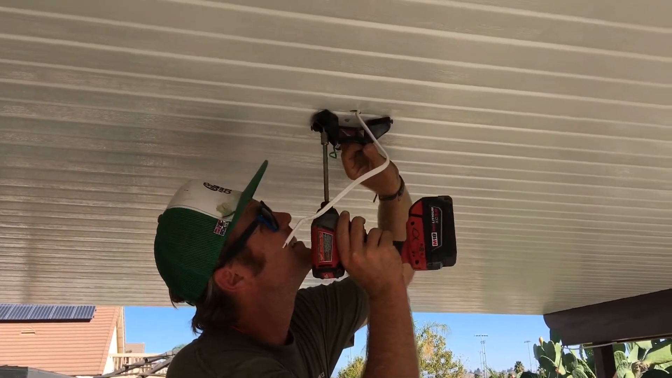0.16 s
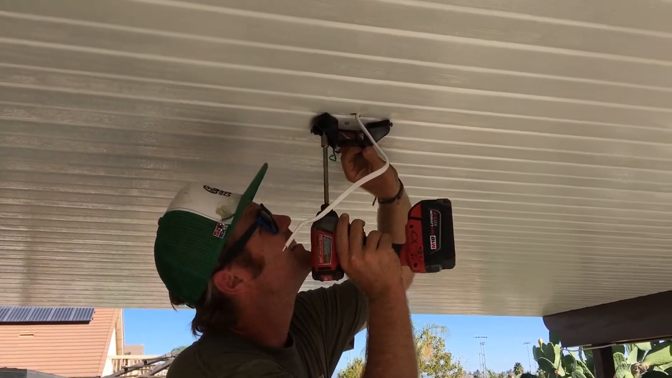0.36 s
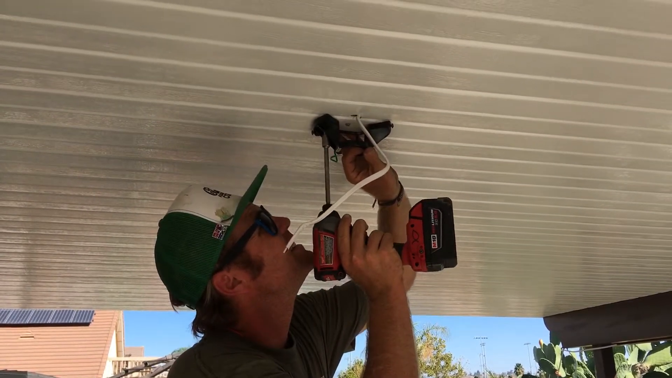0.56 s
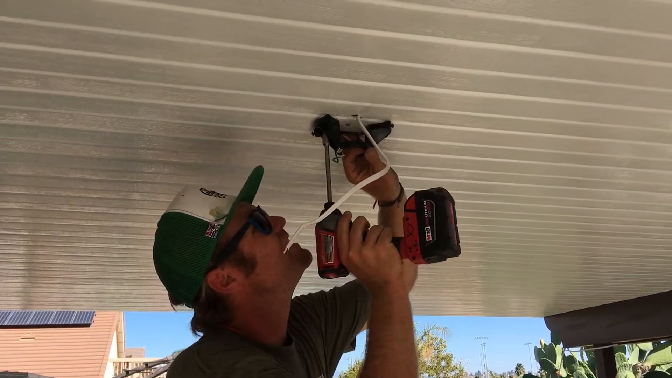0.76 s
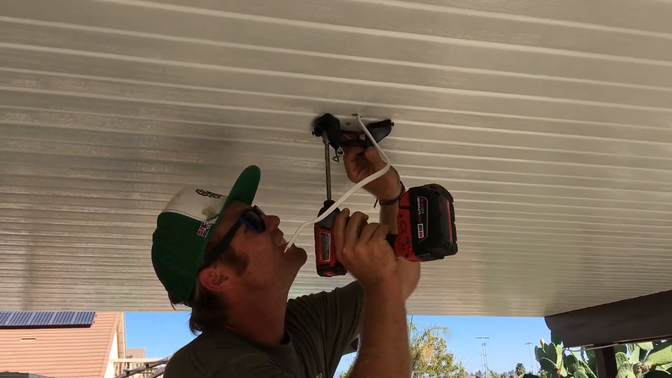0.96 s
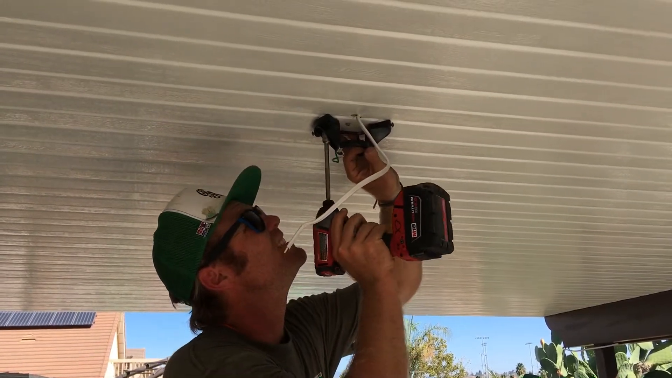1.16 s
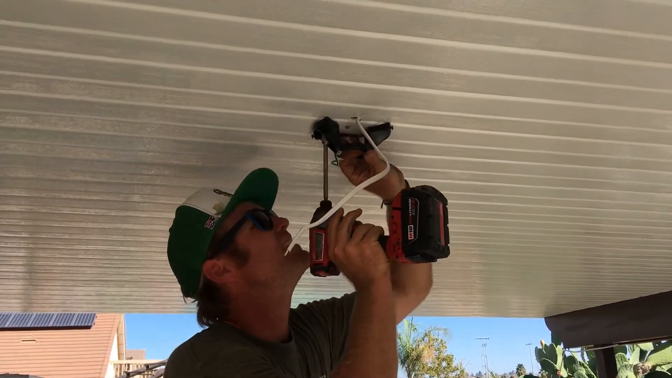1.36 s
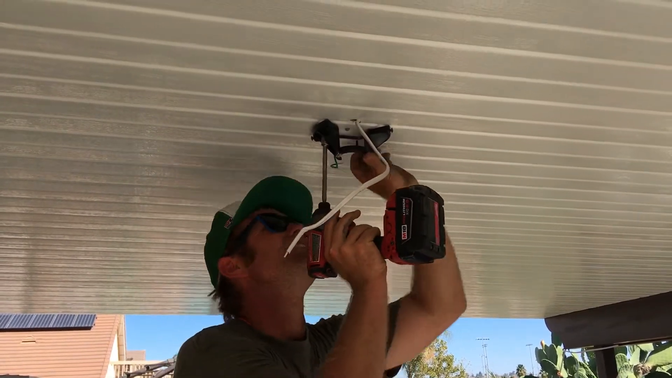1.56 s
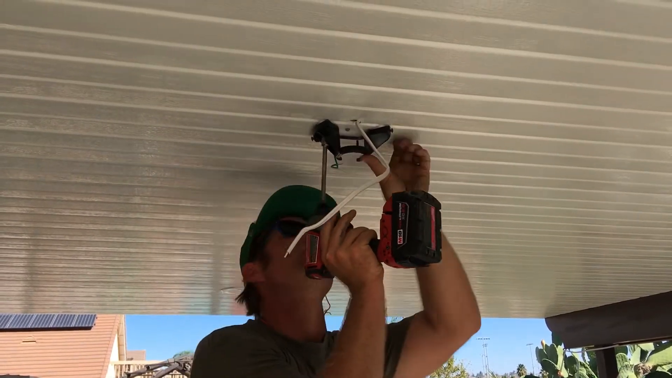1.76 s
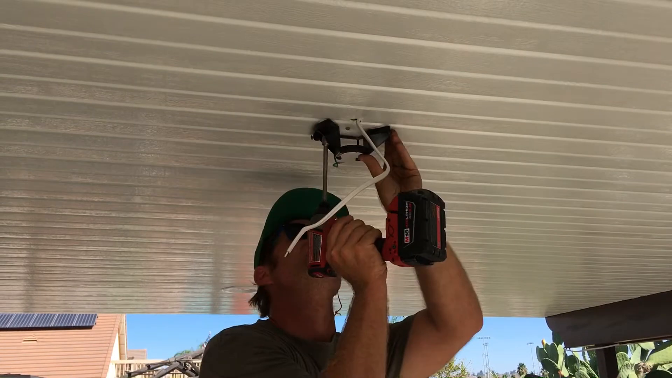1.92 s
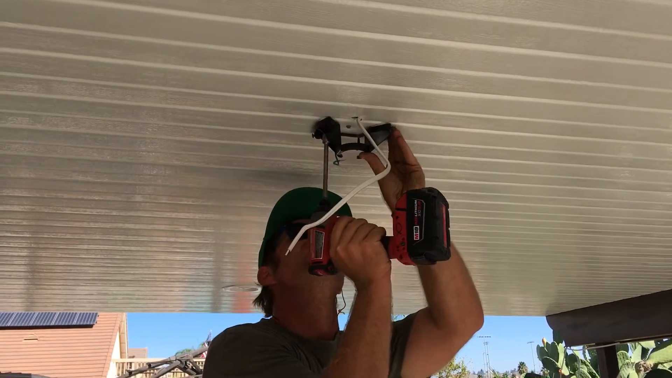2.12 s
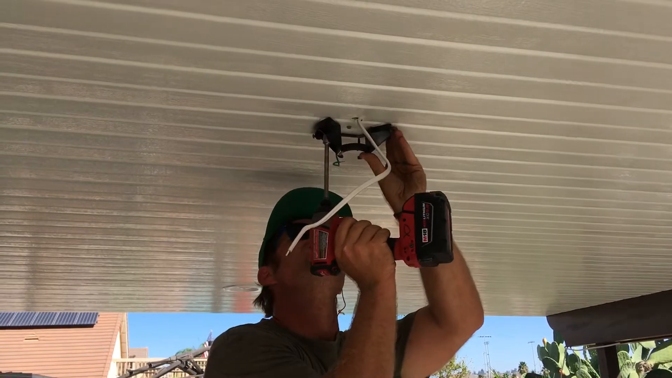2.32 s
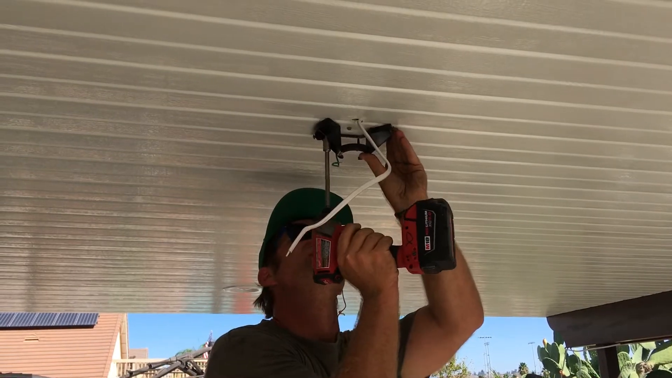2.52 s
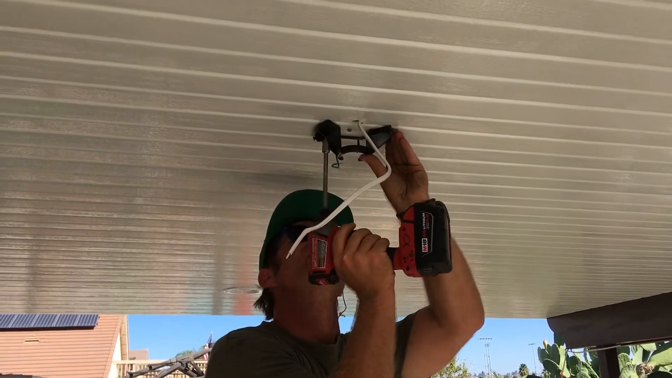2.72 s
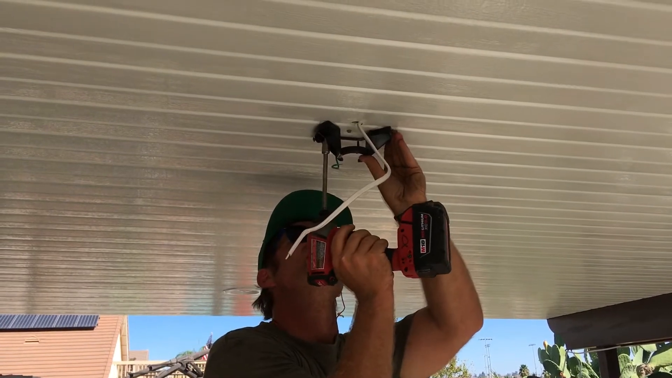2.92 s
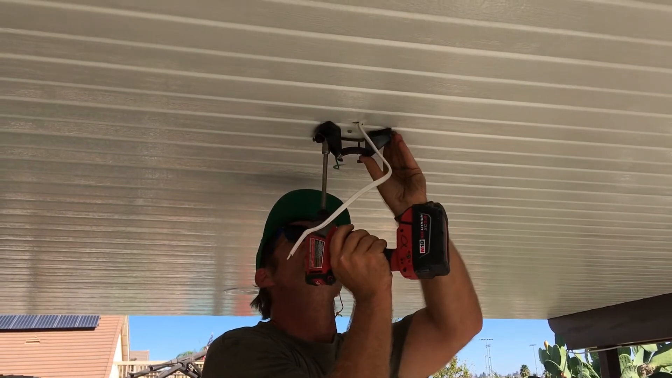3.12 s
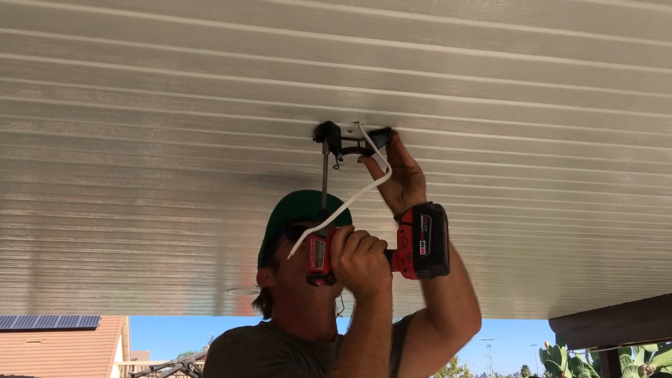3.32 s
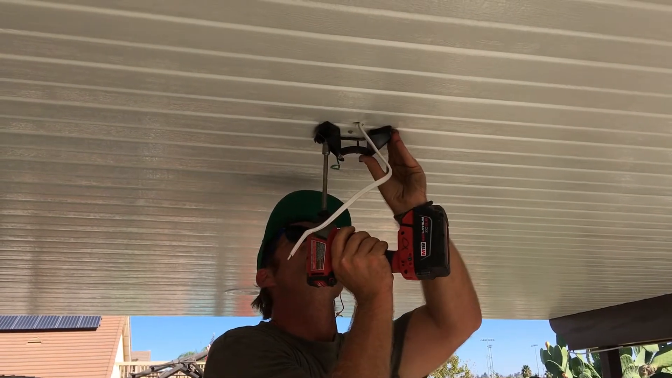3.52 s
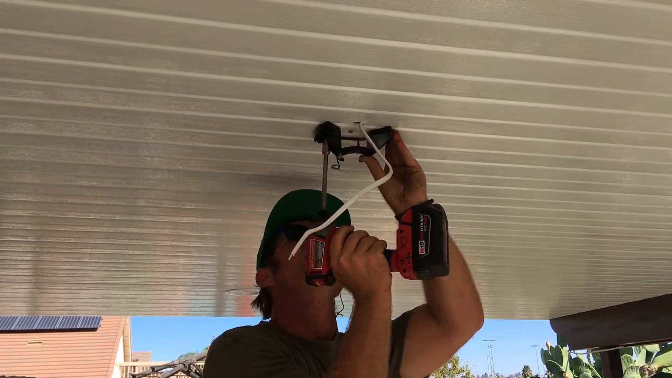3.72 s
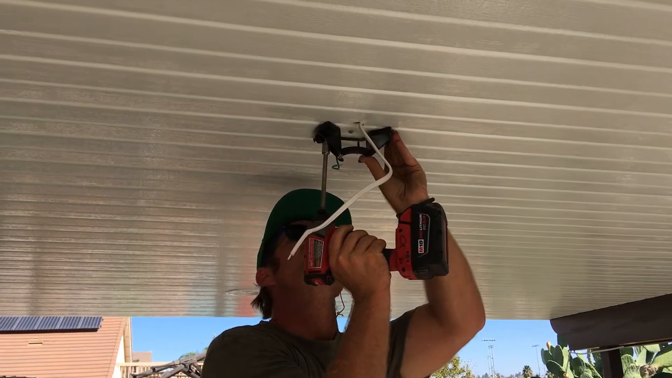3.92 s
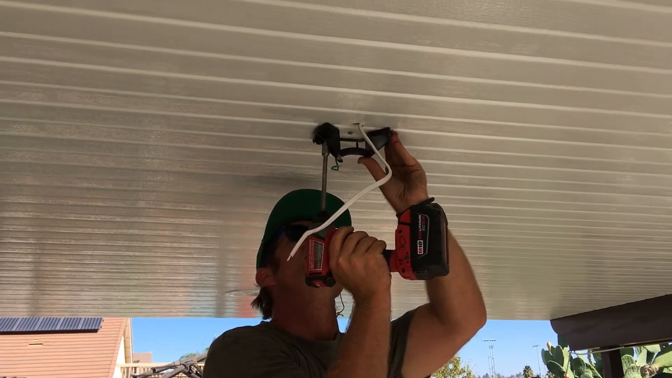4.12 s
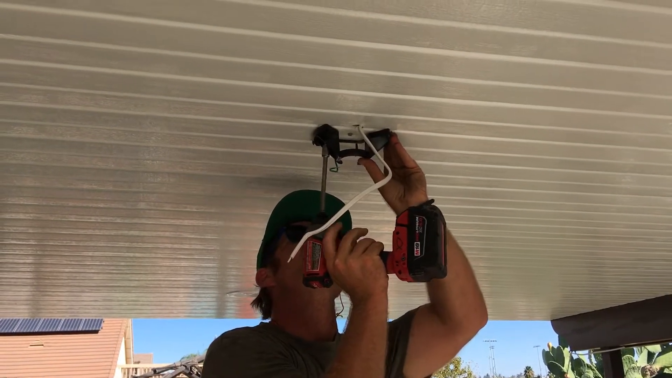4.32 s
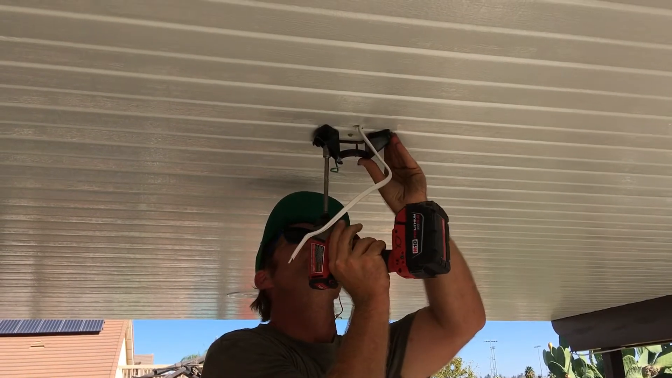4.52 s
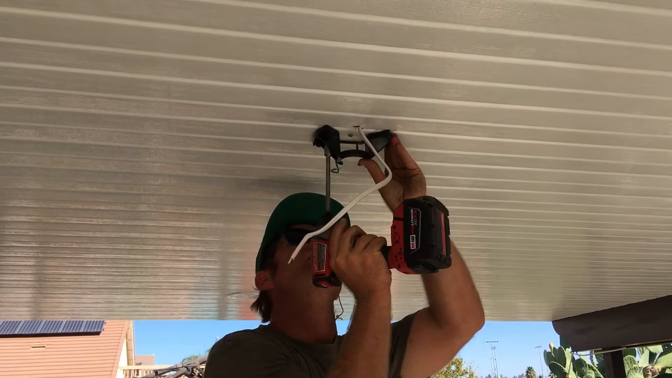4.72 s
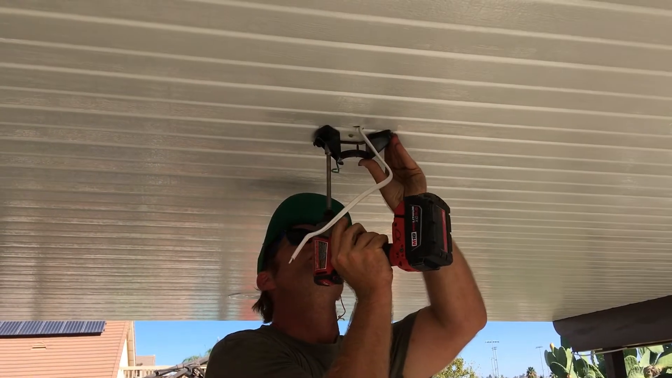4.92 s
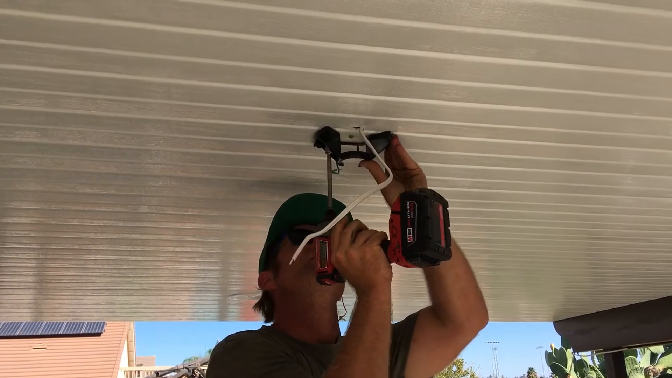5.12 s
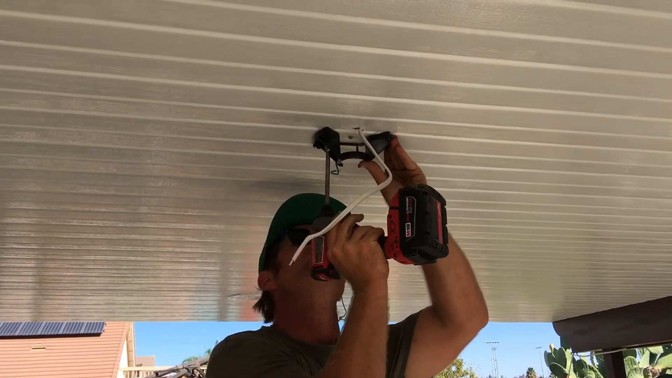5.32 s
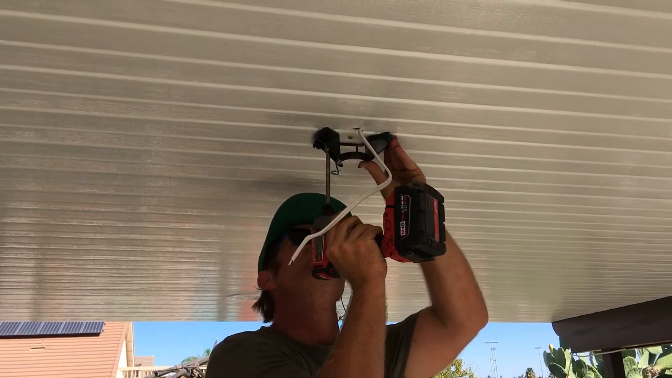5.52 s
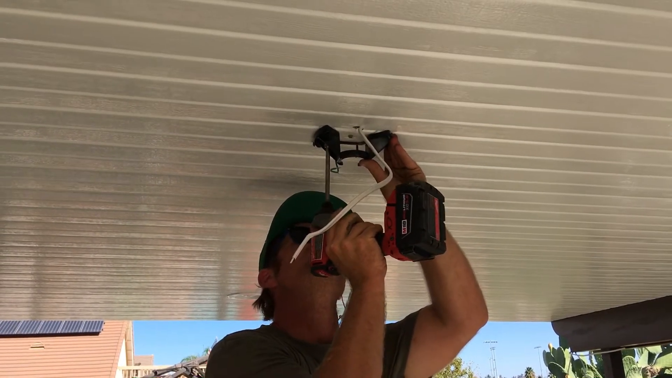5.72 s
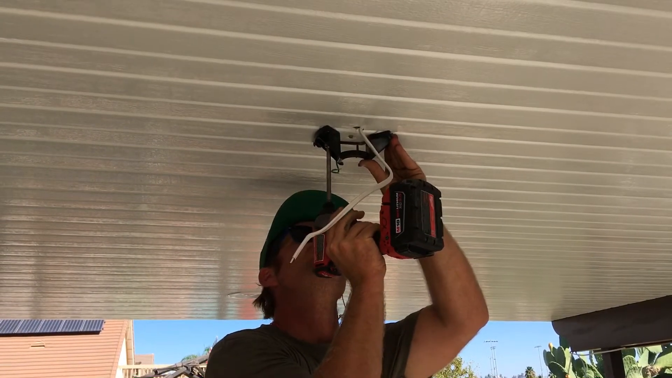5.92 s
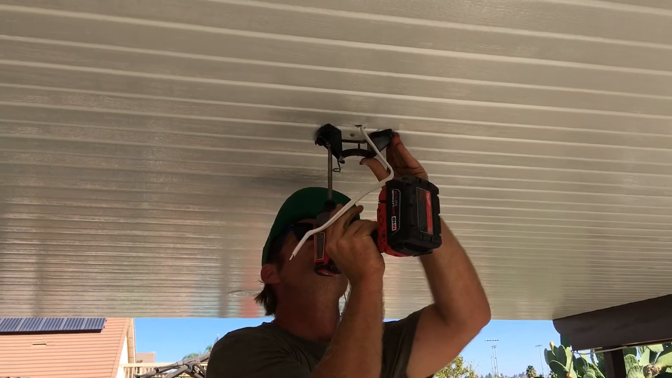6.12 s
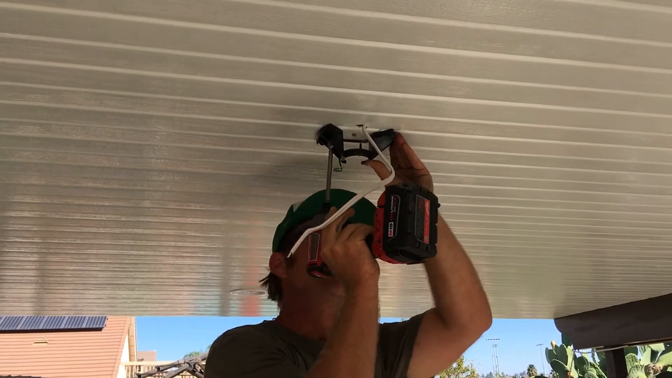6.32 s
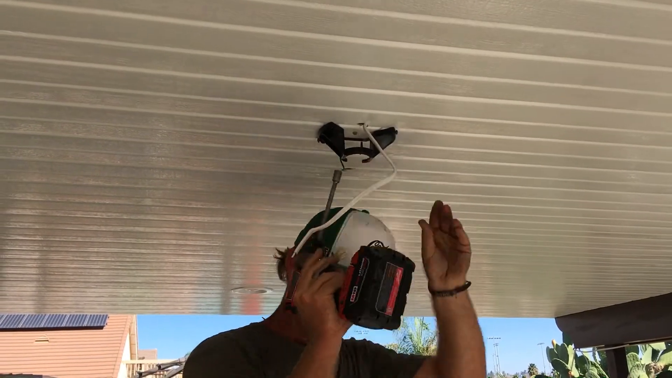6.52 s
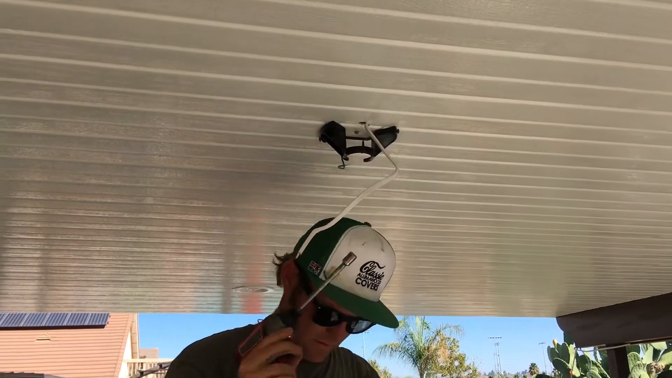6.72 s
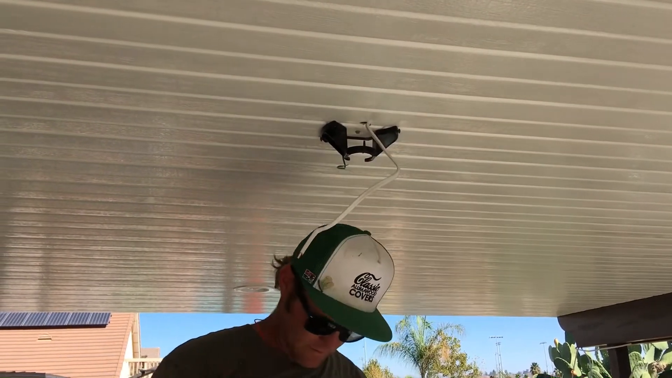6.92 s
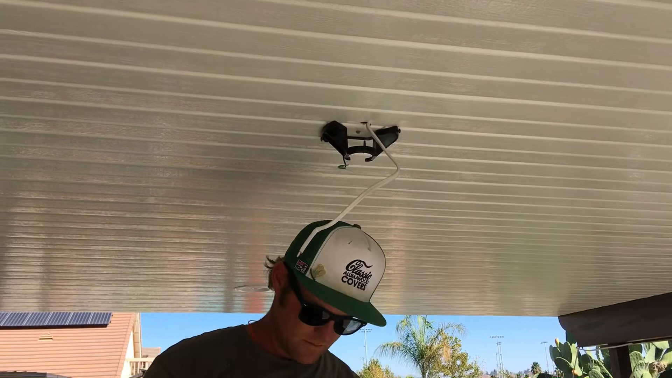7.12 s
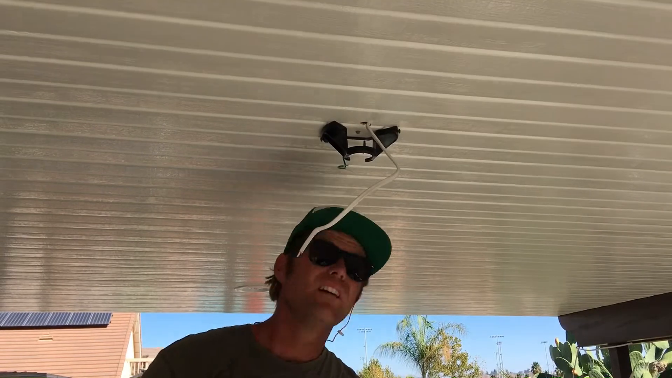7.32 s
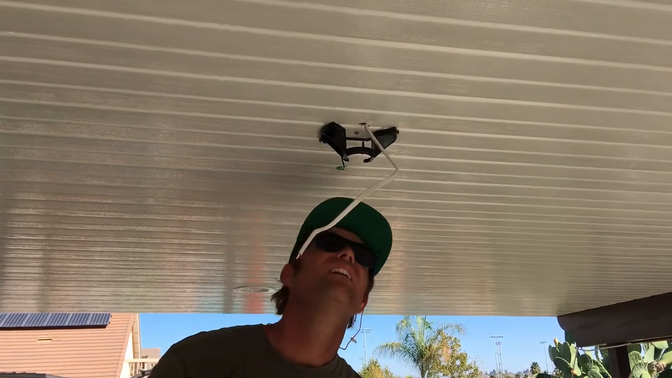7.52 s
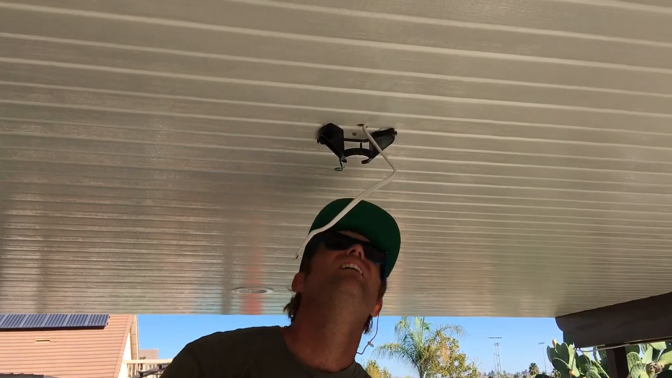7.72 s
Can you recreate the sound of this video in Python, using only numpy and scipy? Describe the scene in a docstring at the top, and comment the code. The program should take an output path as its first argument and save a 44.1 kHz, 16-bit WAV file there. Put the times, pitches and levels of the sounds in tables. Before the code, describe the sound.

A power driver rattles a screw into a metal bracket overhead: sharp steel cracks at about forty blows a second, gear whir and a thin high whistle, with sheet-metal panels ringing and low booms fading after each burst. Bit and bracket tick lightly in the gaps. After a last rapid cluster of bursts, a light slip and ping, then only low outdoor wash and hum. Close, mono, open air beneath a resonant roof.

```python
"""A cordless impact driver sinks a screw through a metal bracket into an aluminium patio roof in ten short bursts.
Hammer: about 40 blows/s, each a noise crack that rings steel modes, roof panel modes and a diffuse roof tail.
Roof: slow sine waves boom after each run and return weaker. Motor: a thin whistle plus whirring gear noise.
Bit and bracket click between bursts: struck modes and noise ticks. Outdoors: filtered noise wash and low hum."""
import sys
import numpy as np
from scipy import signal
from scipy.fft import rfft, irfft, next_fast_len
from scipy.io import wavfile
from scipy.ndimage import uniform_filter1d, minimum_filter1d

SR = 44100
rng = np.random.default_rng(int(sys.argv[2]) if len(sys.argv) > 2 else 0)


def digitize_waveform(pressure):
    """Quantize a signal to 16-bit integers and store it at the path in sys.argv[1].

    Rows of a 2-D input are taken as channels; values are limited to [-1, 1].
    """
    field = np.atleast_2d(pressure).T
    bounded = np.clip(field, -1, 1)
    quanta = np.round(bounded * 32767).astype(np.int16)
    wavfile.write(sys.argv[1], SR, quanta)


N = 342392


def amp(db):
    """Decibels to gain."""
    return 10 ** (np.asarray(db) / 20)


def unit(x):
    """Scales to rms 1."""
    return x / np.sqrt(np.mean(x ** 2) + 1e-20)


def read(points, hz):
    """Interpolates (frequency, value) points on a log-frequency axis."""
    f, value = np.transpose(points)
    return np.interp(np.log(hz + 1), np.log(f), value)


def add(mix, start_s, sound):
    """Mixes a sound in at start_s, cut at the end of the mix."""
    part = mix[max(round(start_s * SR), 0):][:len(sound)]
    part += sound[:len(part)]


def seconds(length_s):
    """Time axis [s]."""
    return np.arange(int(length_s * SR)) / SR


def colour(x, spectrum, size=4096):
    """Minimum-phase filter of energy 1 with the given spectrum shape."""
    hz = abs(np.fft.fftfreq(size, 1 / SR))
    log_gain = np.log(amp(read(spectrum, hz)))
    response = np.exp(np.conj(signal.hilbert(log_gain)))
    taps = np.fft.ifft(response).real
    return signal.oaconvolve(x, taps[:size // 2] / np.linalg.norm(taps))[:len(x)]


def ring(force, modes):
    """Excites decaying sine modes with a force signal."""
    t = seconds(max(t60_s for _, _, t60_s in modes))
    response = sum(amp(db - 60 * t / t60_s) * np.sin(2 * np.pi * hz * t) for hz, db, t60_s in modes)
    return signal.oaconvolve(force, response)[:N]


def snap(decay_s):
    """Metal contact: exponentially decaying noise burst of energy 1."""
    t = seconds(.02)
    burst = rng.standard_normal(len(t)) * np.exp(-t / decay_s)
    return burst / np.linalg.norm(burst)


def bounce(x, delay_s=.0102, db=-11):
    """Adds one discrete reflection."""
    return x + amp(db) * np.pad(x, (round(delay_s * SR), 0))[:N]


# Roof tail decay: (frequency [Hz], t60 [s])
ROOF_T60 = [(100, 1.81), (260, 0.56), (700, 0.42), (1840, 0.37), (4850, 0.34), (12800, 0.19)]


def roof(x, build_s=0.0029, early_db=4, early_decay_s=0.012):
    """Waves spread through the ribbed panels: dense early returns, then a tail whose treble dies first."""
    hz, t, bins = signal.stft(rng.standard_normal(SR), SR, nperseg=256)
    decay = amp(-60 * t / read(ROOF_T60, hz)[:, None])
    tail = signal.istft(bins * decay, SR, nperseg=256)[1]
    t = np.arange(len(tail)) / SR
    tail *= (1 - np.exp(-t / build_s)) * (1 + amp(early_db) * np.exp(-t / early_decay_s))
    return signal.oaconvolve(x, tail / np.linalg.norm(tail))[:N]


# Outdoor wash spectrum: (frequency [Hz], relative density [dB])
WASH_SPECTRUM = [(25, -23.5), (45, -9.5), (62, -2), (82, -1.5), (200, -9), (300, -12), (560, -14),
                 (1000, -20.5), (2200, -25.5), (4800, -37.5), (6200, -39), (7800, -45.5), (10400, -48.5),
                 (12000, -47.5), (16000, -51)]
# Distant machine hum bands: (centre [Hz], width [Hz], level [dB])
HUM = [(59.4, 8.9, -41.5), (111.7, 16, -45.5), (175, 22, -45.5), (237.3, 11, -55.5)]
# Wash level change in the upper band: (time [s], level [dB])
WASH_LEVEL = [(0, 0.5), (0.6, 0.5), (1.65, -1.5), (2.9, 0.5), (3.6, 0.5), (4.4, 0), (7.1, 0.5), (7.7, 1.5)]


def outdoors(wash_db=-42, split_hz=450, drift_db=0.64, uneven_db=1.5):
    """Drifting noise wash of distant traffic, combed by reflections, plus narrow-band noise as a wavering hum."""
    size = next_fast_len(N)
    hz = np.fft.rfftfreq(size, 1 / SR)
    white, drone = rfft(rng.standard_normal((2, size)))
    delays_s = rng.uniform(0.0036, 0.032, size=12)
    ripple = unit(sum(np.cos(2 * np.pi * hz * delay_s) for delay_s in delays_s))
    wash = unit(irfft(white * amp(read(WASH_SPECTRUM, hz) + uneven_db * ripple), size)[:N])
    now = np.arange(N) / SR
    upper = signal.sosfiltfilt(signal.butter(2, split_hz, "highpass", fs=SR, output="sos"), wash)
    wash = wash + upper * (amp(np.interp(now, *np.transpose(WASH_LEVEL))) - 1)
    t = np.arange(0, N, 400) / SR
    drift = unit(sum(np.sin(2 * np.pi * (f * t + rng.random())) for f in np.geomspace(.3, 5, 10)))
    drifting_wash = amp(wash_db + drift_db * np.interp(now, t, drift)) * wash
    bands = sum(amp(db) * unit(1 / (1 + ((hz - f) / width_hz) ** 2) ** 2) for f, width_hz, db in HUM)
    hum = irfft(drone * bands, size)[:N]
    return drifting_wash + hum


# Light knocks of bit and bracket: (time [s], relative bracket ring [dB], relative tick [dB])
KNOCKS = [(.6286, -24.5, -19.5), (.6815, -20, -17.5), (0.7219, 3, -11), (1.8155, -10, -3),
          (1.8192, -1.5, -2.5), (1.896, -31.5, -20.5), (1.915, -24, -14), (2.108, -8, -10.5),
          (3.495, -34, -21), (3.5275, -30, -22), (4.4968, -13, -2.5), (4.5468, -10, -6.5),
          (4.6704, -16, -18), (4.712, -15, -16), (5.864, -6.5, -6), (5.867, -6.5, -8.5), (6.453, -17, -8),
          (7.315, -38, -24), (7.736, -22, -44)]
# Bracket modes: (frequency [Hz], relative level [dB], t60 [s])
BRACKET_MODES = [(1770, -20, 0.0117), (2300, -2.5, 0.018), (2640, -2, 0.018), (3330, -6.5, 0.0068),
                 (3800, 3.5, 0.0098), (4200, -0.5, 0.0086), (4600, -8.5, 0.0047), (6550, -4.5, 0.0063)]
# Thin tick spectrum: (frequency [Hz], relative density [dB])
TICK_SPECTRUM = [(300, -17), (1500, -11), (4000, -13), (8000, -7), (12500, -1), (15500, -11.5)]
# Span of faint ticks as the hand adjusts the bracket: (from [s], to [s])
FIDGET = (1.8, 4.48)
# Bit ring on leaving the screw: (time [s], frequency [Hz], level [dB], t60 [s])
PING = (6.459, 1150, -33.5, .17)


def knocks(ring_db=-23, tick_db=-4, wet_db=-10, lowest_hz=1500, fidget_db=-38, scatter_db=2, count=12):
    """Bit seats and bracket shifts: modes plus noise ticks, with roof tail; a sine ping as the bit slips off."""
    taps, ticks = np.zeros(N), np.zeros(N)
    for s, body_db, thin_db in KNOCKS:
        add(taps, s, amp([body_db + ring_db]))
        add(ticks, s, amp(thin_db + tick_db) * snap(decay_s=0.0014))
    for s in rng.uniform(*FIDGET, size=count):
        add(ticks, s, amp(fidget_db + scatter_db * rng.standard_normal()) * snap(decay_s=.003))
    # a small part radiates little bass
    highpass = signal.butter(2, lowest_hz, "highpass", fs=SR, output="sos")
    bracket = signal.sosfilt(highpass, ring(taps, BRACKET_MODES))
    sound = bounce(bracket + colour(ticks, TICK_SPECTRUM), db=-14.5)
    sound = sound + amp(wet_db) * roof(sound, build_s=.004, early_db=-8, early_decay_s=.012)
    s, hz, db, t60_s = PING
    t = seconds(.5)
    add(sound, s, amp(db - 60 * t / t60_s) * np.sin(2 * np.pi * hz * t))
    return sound


# Slow roof waves, main mode first: (frequency [Hz], relative level [dB], crest after last blow [s],
#   length [s], round trip [s], level change per trip [dB])
ROOF_WAVES = [(92.3, 0, 0.04, 0.11, .32, -9.5), (121.2, -1.5, -0.0076, 0.06, .185, -3.5),
              (75.4, -9, -0.061, 0.17, .39, -9.5), (165.5, -0.5, 0.004, 0.039, .15, -14.5)]


def booms(waver_hz=1.6, count=4):
    """Each run launches slow waves along the roof; they swell, fade and return weaker after each round trip."""
    t, coarse_t, out = np.arange(N) / SR, np.arange(0, N, 200) / SR, np.zeros(N)
    for k, (hz, db, lag_s, length_s, trip_s, loss_db) in enumerate(ROOF_WAVES):
        power = np.zeros(len(coarse_t))
        for start_s, strokes, gap_s, stall_s, *_, main_db, other_db in RUNS:
            crest_s = start_s + stall_s + (round(strokes) - 1) * gap_s + lag_s
            boom_db = (other_db if k else main_db) + db
            for n in range(count):
                swell = np.exp(-((coarse_t - crest_s - n * trip_s) / length_s) ** 2)
                power += (amp(boom_db + n * loss_db) * swell) ** 2
        waver = unit(uniform_filter1d(rng.standard_normal(len(coarse_t)), size=30))
        pitch_hz = np.interp(t, coarse_t, hz + waver_hz * waver)
        level = np.interp(t, coarse_t, np.sqrt(power))
        out += level * np.sin(2 * np.pi * np.cumsum(pitch_hz) / SR)
    return out


# Trigger pulls: (start [s], release [s], relative whistle level [dB], relative gear level [dB])
PULLS = [(0.673, 0.981, 8.5, 0.5), (1.108, 1.346, -6, -1), (2.088, 2.258, 4, -1.5), (2.397, 2.553, -1.5, 1),
         (4.7, 4.889, 4.5, 0.5), (4.987, 5.161, -14, 2.5), (5.257, 5.458, -8, 3), (5.547, 5.73, -7, 0.5),
         (5.842, 5.972, -9, 2), (6.095, 6.253, -6, 0.5)]
# Gear noise spectrum: (frequency [Hz], relative density [dB])
GEAR_SPECTRUM = [(100, -8), (500, 4), (1500, 2.5), (3300, 2.5), (6000, -7.5), (10000, -6.5), (15500, -15.5)]


def motor(switch_hz=9920, nominal_turn_hz=750, spin_up_s=.036, brake_s=0.012, whistle_db=-44, gears_db=-28.0,
          gears_rise_s=0.07, swell_power=0.9, sag=.25, flutter=.5, wet_db=-3):
    """Speed controller whistle splits into three lines as the rotor spins up; gears whirr as modulated noise."""
    whistle, whirr = np.zeros(N), np.zeros(N)
    for start_s, stop_s, tone_db, gear_db in PULLS:
        t = seconds(stop_s - start_s + .1)
        running = np.exp(-np.maximum(t - (stop_s - start_s), 0) / brake_s)
        speed = (1 - np.exp(-np.maximum(t - .008, 0) / spin_up_s)) * running
        # winding the hammer spring makes the rotor load fluctuate
        load = unit(uniform_filter1d(rng.standard_normal(len(t)), size=600)) * speed ** 3
        turn = 2 * np.pi * np.cumsum(nominal_turn_hz * speed * (1 - sag * load)) / SR
        carrier = 2 * np.pi * switch_hz * t
        lines = np.sin(carrier - turn) + 0.34 * np.sin(carrier + turn) + .3 * np.sin(carrier - 2 * turn)
        # commutation roughens the whistle
        lines *= 1 + flutter * unit(uniform_filter1d(rng.standard_normal(len(t)), size=60))
        add(whistle, start_s, amp(tone_db) * lines * running * np.minimum(t / 0.013, 1))
        teeth = rng.standard_normal(len(t)) * (1 + .6 * np.cos(turn))
        rise = np.minimum(t / gears_rise_s, 1) ** swell_power
        add(whirr, start_s, amp(gear_db) * teeth * speed * rise)
    sound = amp(whistle_db) * whistle + amp(gears_db) * colour(whirr, GEAR_SPECTRUM)
    return sound + amp(wet_db) * roof(sound)


# Hammer runs, one per pull: (first blow [s], blow count, blow gap [s], offset of later blows [s],
#   relative crack [dB], first blow accent [dB], share passed to roof [dB], change by last blow [dB],
#   relative panel ring [dB], main boom [dB], other booms [dB])
RUNS = [(0.762, 11, 0.02, 0.01, 2.5, -3.5, -1, -6, -19, -32, -23.5),
        (1.1728, 8, 0.022, -0.00052, 1.5, 8.5, -3.5, -4, 0, -21, -28.5),
        (2.1822, 2, .025, 0.034, 3.5, 8.5, 0, 0, 7, -23.5, -22),
        (2.4629, 3, 0.027, -0.0026, 8.5, -1, 1.5, -2, 1, -23.5, -16.5),
        (4.7992, 4, 0.025, -0.00063, -3.5, 2, 1, 0, 5, -22, -31.5),
        (5.0303, 5, 0.024, 0.01, -2.5, 1.5, 0, 0.5, 3.5, -19, -23),
        (5.3173, 6, 0.026, -.001, 1.5, 3, 0, -8, 7, -23.5, -23.5),
        (5.6132, 5, 0.029, -0.0019, 4, 3.5, 1, -10, 7, -24.5, -27.5),
        (5.9089, 3, .02, .008, 1, -5.5, 2.5, -14.5, -5, -23.5, -37),
        (6.1597, 4, 0.026, 0, -1.5, 6, 3, -8.5, 0, -24, -26)]
# Lone clacks, hammer catching once outside the even beat: (time [s], relative crack [dB], share to roof [dB])
CLACKS = [(0.7212, -3.5, -6.5), (0.755, -6.5, -5), (2.14, -7, -8.5), (2.4558, -13, -9), (2.5888, -6.5, -11),
          (4.7508, -1.5, -11.5), (4.7887, -13, -0.5), (5.0228, -18, -7)]


def blows(fade_power=4, crack_scatter_db=3.5, roof_scatter_db=-1, jitter_s=.0004):
    """Lists blows (time [s], crack, roof, panel ring [dB]): jittered beat, level easing late in each run."""
    out = [(s, crack_db, roof_db, 0) for s, crack_db, roof_db in CLACKS]
    for start_s, count, gap_s, stall_s, crack_db, accent_db, roof_db, fade_db, panel_db, *_ in RUNS:
        k = np.arange(round(count))
        early, harder, deeper = rng.standard_normal((len(k), 3)).T
        times_s = start_s + k * gap_s + (k > 0) * (stall_s + jitter_s * early)
        # the trigger is let go near the end
        easing_db = fade_db * (k / k[-1]) ** max(fade_power, 1)
        cracks_db = crack_db + easing_db + accent_db * (k == 0) + crack_scatter_db * harder
        shakes_db = roof_db + easing_db + roof_scatter_db * deeper
        out += zip(times_s, cracks_db, shakes_db, np.full(len(k), panel_db))
    return out


# Crack spectrum: (frequency [Hz], relative density [dB])
CRACK_SPECTRUM = [(200, -22), (1200, 0), (3800, -1.5), (5500, 3.5), (8800, 4), (10300, 1), (11000, 3.5),
                  (12500, 6.5), (14200, 5), (15100, 3.5), (15700, 3)]
# Roof rattle spectrum: (frequency [Hz], relative density [dB])
RATTLE_SPECTRUM = [(35, -23), (110, 9), (165, 12.5), (215, 7.5), (300, 7), (550, 0.5), (800, 0.5),
                   (1400, 0), (2000, -1), (3150, -2), (3700, 0), (4450, -2), (5200, -8.5), (7000, -6.5),
                   (9300, -4.5), (10350, -12.5), (10900, -5), (15300, -1)]
# Steel bit modes: (nominal frequency [Hz], relative level [dB], t60 [s])
STEEL_MODES = [(3735, 4, 0.052), (3836, 0.5, 0.055), (4415, 0, 0.078), (8160, -18, 0.08),
               (12300, 1.5, .025), (13470, -4, .02), (15400, 8.5, 0.027), (15300, 4, .02)]
# Roof panel modes: (frequency [Hz], relative level [dB], t60 [s])
PANEL_MODES = [(158, -7, 0.4), (271, -6.5, 0.25), (305.3, -1.5, 0.42), (385.8, -1.5, 0.36),
               (450.6, -4.5, 0.21), (514, -3, 0.18), (605, -4.5, 0.34), (692, -4, 0.23), (950, -6.5, 0.51),
               (1138, -3, 0.21), (1311, -4, 0.21), (1324, -3, 0.19), (1430, -7, 0.15), (1667, -2, 0.22)]


def hammer(crack_db=8.5, rebound_db=-7, rebound_within_s=.01, graze_db=-19, graze_lead_s=.006, rattle_db=13,
           after_db=-7, steel_db=-27, panels_db=-33, detune=0.019, count=3):
    """Each blow grazes, cracks and rebounds twice; contacts ring the steel bit, pushes shake roof and panels."""
    pushes, (contacts, shakes) = np.zeros(N), np.zeros((2, count, N))
    for k, (s, db, roof_db, panel_db) in enumerate(blows()):
        # the bit turns, so successive blows meet screw and roof differently
        cracks, shake = contacts[k % count], shakes[k % count]
        # the lugs touch just before they lock
        add(cracks, s - graze_lead_s, amp(db + graze_db + roof_db) * snap(decay_s=0.0023))
        add(cracks, s, amp(db) * snap(decay_s=0.0015))
        add(shake, s, amp([roof_db]))
        add(pushes, s, amp([roof_db + panel_db]))
        for wait_s in rng.uniform(.002, rebound_within_s, size=2):
            add(cracks, s + wait_s, amp(db + rebound_db + roof_db) * snap(decay_s=.0007))
            # the screw slips on between rebounds
            add(shake, s + wait_s / 2, amp([roof_db + after_db]))
    rattle = colour(sum(roof(shake) for shake in shakes), RATTLE_SPECTRUM)
    # each seating of the bit rings at a slightly different pitch
    shifts = 1 + detune * np.linspace(-1, 1, count)
    steel = np.zeros(N)
    for cracks, shift in zip(contacts, shifts):
        steel += ring(cracks, [(hz * shift, db, t60_s) for hz, db, t60_s in STEEL_MODES])
    direct = amp(crack_db) * colour(contacts.sum(0), CRACK_SPECTRUM) + amp(steel_db) * steel
    panels = amp(panels_db) * ring(pushes, PANEL_MODES)
    return bounce(direct, db=-11.5) + amp(rattle_db) * rattle + panels


def scene():
    """Sums driver, roof, bracket and outdoors to one channel."""
    return (hammer() + booms() + motor() + knocks() + outdoors())[None]


def record(dry, ceiling=0.66, size=61, edge_hz=15780):
    """Fast limiter on the loudest peaks, then a linear-phase low-pass."""
    gain = minimum_filter1d(ceiling / np.maximum(abs(dry), ceiling), size)
    held = dry * uniform_filter1d(gain, size)
    lowpass = signal.firwin(801, edge_hz, window=("kaiser", 8), fs=SR)
    return signal.oaconvolve(held, lowpass[None], "same")


dry = scene()
out = record(dry)
digitize_waveform(out)
```